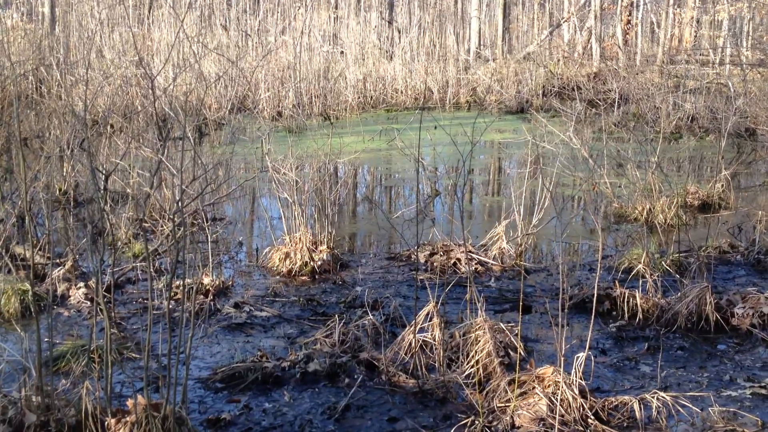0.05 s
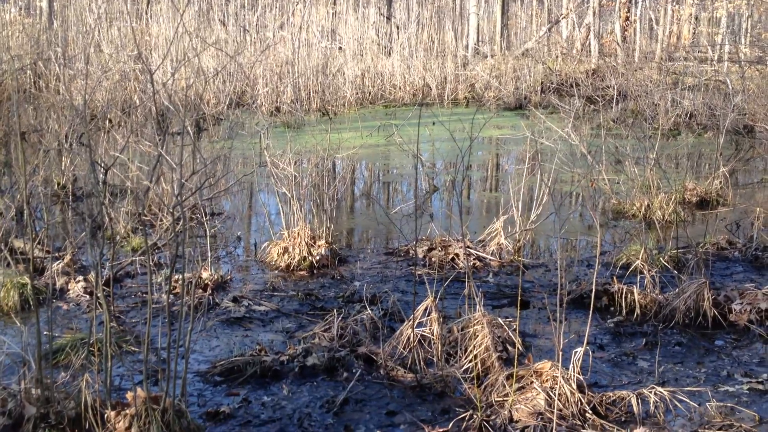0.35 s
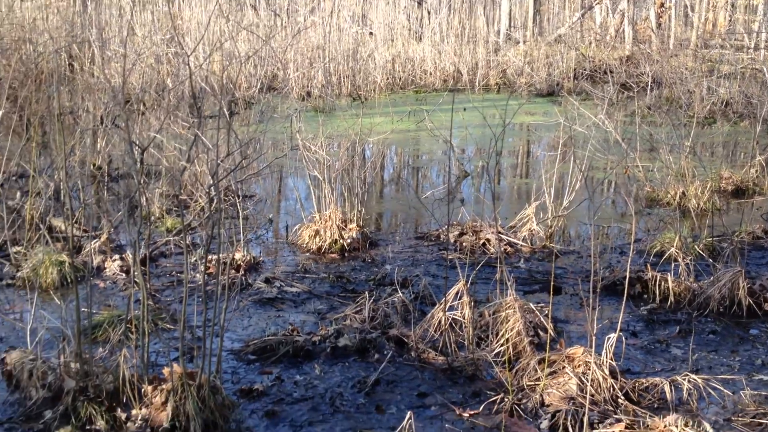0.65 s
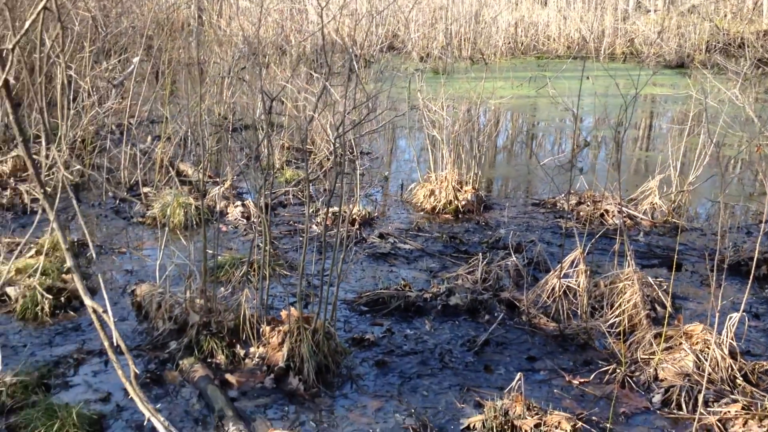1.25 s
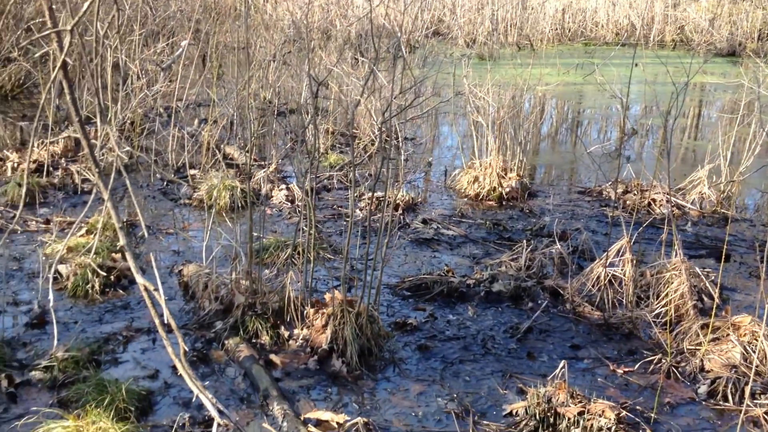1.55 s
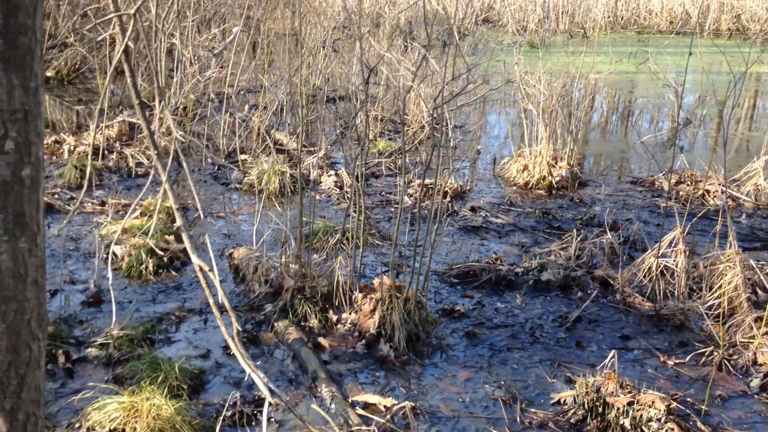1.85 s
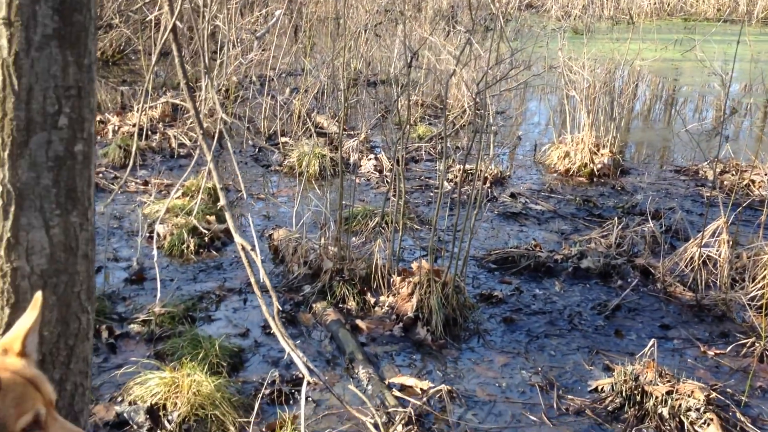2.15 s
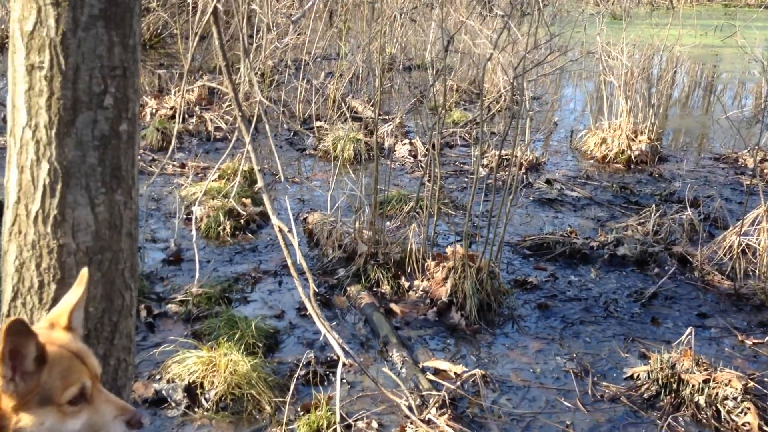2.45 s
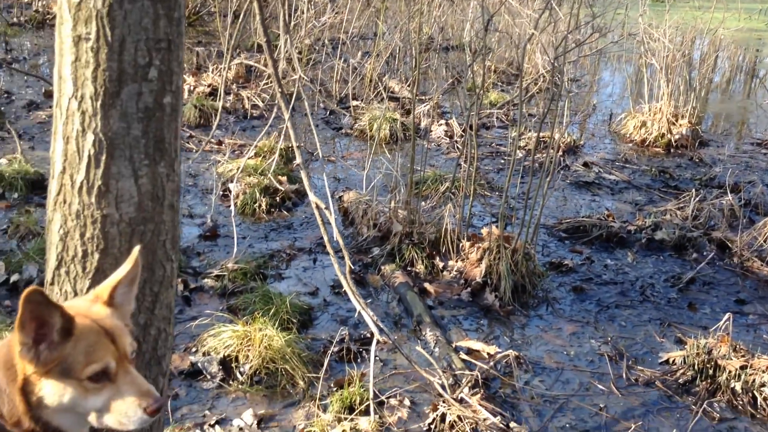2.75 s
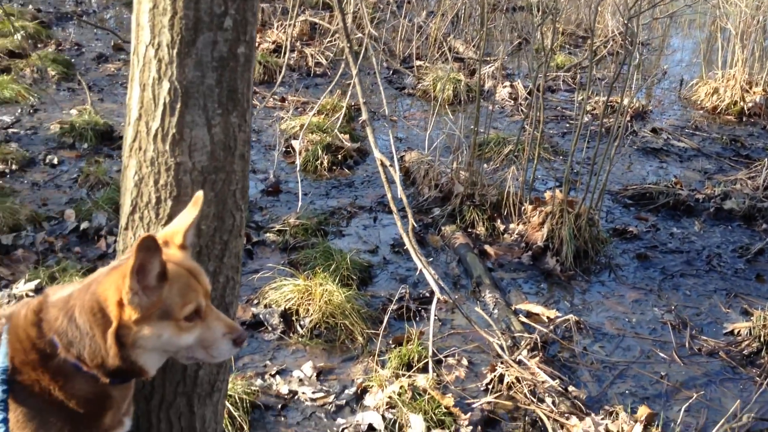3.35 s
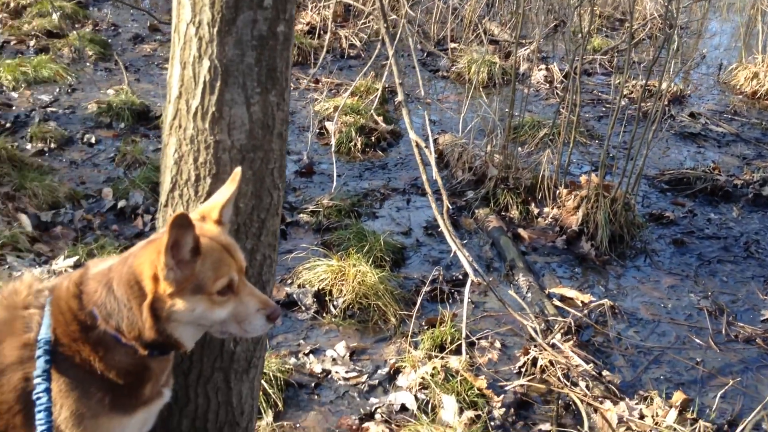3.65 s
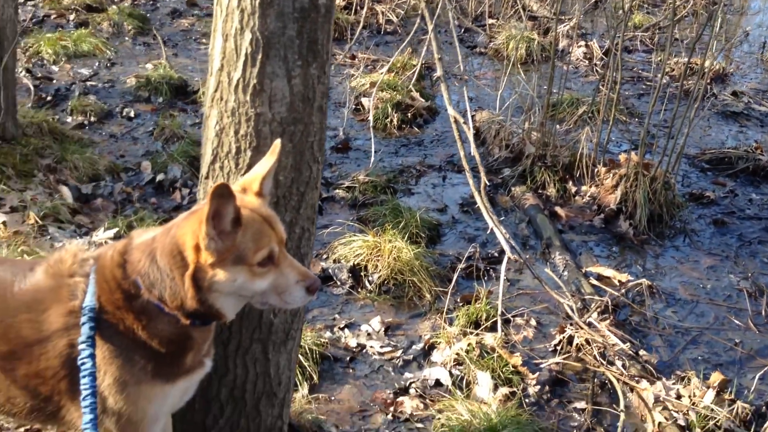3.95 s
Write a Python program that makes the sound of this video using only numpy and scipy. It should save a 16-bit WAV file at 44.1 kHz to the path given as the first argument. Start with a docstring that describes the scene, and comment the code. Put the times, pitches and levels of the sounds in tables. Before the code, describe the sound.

A chorus of shrill, rising frog peeps fills a marsh, ending with a short leafy rustle.

```python
"""Rising whistled peeps, near and far: a chorus of spring peepers at a marshy pool, with one short trill.
Each frog's vocal sac radiates a nearly pure tone, and trunks and water scatter it into reverberation.
A far bird squeaks in hoarse harmonic notes, and a distant engine hums, slowly sinking, in a wash of air.
Close by, dry leaves tick; near the end they rustle in a swarm of tiny impulses over a soft footfall."""
import sys
import numpy as np
from scipy import signal
from scipy.fft import rfft, irfft
from scipy.io import wavfile
from scipy.ndimage import uniform_filter1d

SR = 44100
rng = np.random.default_rng(int(sys.argv[2]) if len(sys.argv) > 2 else 0)


def materialize(psi):
    """Save the field psi as 16-bit PCM at rate SR to the path in sys.argv[1].

    A 1-D psi becomes a single channel; in a 2-D psi each row is a channel.
    """
    bounded = np.clip(np.atleast_2d(psi).T, -1, 1)
    quanta = np.round(bounded * 32767).astype(np.int16)
    wavfile.write(sys.argv[1], SR, quanta)


N = 176400

# Levels in the tables are relative.
# Near calls: start_s, length_s, first_hz, last_hz, sag_hz, level_db, swell_db
NEAR_PEEPS = [(-0.03, 0.061, 2787, 2894.0, -11, -35.5, 3.5), (0.0, 0.12, 2520, 2708.0, 22, -45.5, 11.5),
              (0.018, 0.08, 2945, 3150.0, -0.5, -40, -11), (0.11, 0.076, 2925, 3158.0, -1.5, -39.5, -8),
              (0.115, 0.17, 2822, 3276.0, 1.5, -36.5, -1.5), (0.172, 0.098, 2777, 2942.0, 15.5, -40, 6),
              (0.243, 0.065, 2634, 2674.0, 1, -48.5, 6), (0.305, 0.2, 2318, 2690.0, 49, -39, 16.5),
              (0.331, 0.097, 2735, 2886.0, 21.5, -42.5, 9), (0.42, 0.086, 2940, 3086.0, 9, -41, -3),
              (0.423, 0.1, 2544.0, 2686.0, 7, -34.5, 0.5), (0.53, 0.14, 2654, 2924.0, 4.5, -33.5, 0),
              (0.565, 0.04, 2657, 2702.0, -9.5, -34, 6), (0.561, 0.061, 2854, 3088.0, 1, -42.5, -7),
              (0.66, 0.045, 2822.0, 2830.0, 15.5, -35, -2), (0.691, 0.093, 2494, 2780.0, -6, -34.5, 1.5),
              (0.746, 0.045, 2936.0, 3030.0, 24.5, -39, 2), (0.786, 0.08, 2637, 2736.0, -23, -42.5, 7),
              (0.796, 0.11, 2702, 2956.0, -6.5, -37, -4.5), (0.839, 0.08, 2977, 3200.0, -18.5, -43.5, -4),
              (0.963, 0.099, 2898, 3244.0, 7, -36.5, 0), (0.973, 0.069, 2732, 2862.0, 17.5, -40.5, -7),
              (1.0, 0.15, 2862.0, 3106.0, 25, -42.5, -6), (1.128, 0.06, 2830, 3020.0, 25.5, -42, 10),
              (1.215, 0.099, 2766, 2900.0, -1.5, -36, 3), (1.25, 0.085, 2910, 3154.0, 5.5, -42.5, 3),
              (1.274, 0.087, 2528, 2700.0, 11, -34.5, 4.5), (1.29, 0.082, 2692, 2856.0, 0, -39.5, -5),
              (1.412, 0.092, 2622, 2824.0, -28.5, -43.5, -13), (1.449, 0.11, 2818.0, 3144.0, 32, -39, -7),
              (1.46, 0.091, 2674.0, 2796.0, 38.5, -40, -9), (1.557, 0.175, 2485, 2848.0, 29.5, -38.5, 7.5),
              (1.591, 0.11, 2923, 3270.0, 12, -39.5, 2), (1.679, 0.088, 2800, 3088.0, 30, -41.5, 10),
              (1.684, 0.071, 2533, 2736.0, 3, -38, 0), (1.809, 0.076, 2707, 2868.0, 12.5, -33, 4),
              (1.815, 0.12, 2781, 3008.0, 48, -36.5, -4), (1.959, 0.165, 2318.0, 2564.0, 49, -41.5, 6),
              (1.978, 0.11, 2944.0, 3190.0, 32, -40.5, -6), (2.004, 0.079, 2674, 2830.0, 3, -39, -8),
              (2.234, 0.09, 2767, 3030.0, 1.5, -40, -0.5), (2.348, 0.15, 2518.0, 2864.0, 37, -38.5, 9),
              (2.353, 0.064, 2712.0, 2762.0, 15, -40, 5), (2.36, 0.07, 2937, 3092.0, 34, -39, -1),
              (2.373, 0.065, 2940.0, 3086.0, -2, -46.5, 13), (2.449, 0.12, 2892, 3240.0, 4, -41, 2.5),
              (2.483, 0.065, 2444, 2546.0, 18, -41.5, 1), (2.491, 0.072, 2590, 2736.0, 15, -42, 2.5),
              (2.606, 0.11, 2685, 2930.0, 4, -34, -5), (2.627, 0.075, 2803, 2896.0, 1, -35.5, -4.5),
              (2.763, 0.08, 2525, 2700.0, 6, -38, 10), (2.771, 0.09, 2710, 2836.0, -5, -38.5, 2),
              (2.768, 0.084, 2808, 2980.0, 20.5, -36, 0), (2.785, 0.091, 2992, 3216.0, 2, -43, -2),
              (2.915, 0.053, 2500, 2530.0, 21, -49.5, -1), (2.915, 0.071, 3012, 3146.0, -1, -41.5, -14.5),
              (2.922, 0.08, 2800, 2944.0, 9.5, -42.5, -3), (3.01, 0.073, 2525, 2712.0, -0.5, -47, 9),
              (3.044, 0.11, 2910, 3210.0, 5.5, -38, -5), (3.079, 0.089, 2880, 3020.0, 10.5, -44.5, -8),
              (3.206, 0.11, 2656, 2874.0, 35, -41.5, 10), (3.207, 0.22, 2518, 2986.0, 24.5, -37.5, 2),
              (3.304, 0.07, 2993, 3030.0, 1.5, -43, 10), (3.33, 0.26, 2388, 2964.0, 55, -37.5, 7),
              (3.363, 0.1, 2536, 2746.0, 7, -42, 16), (3.39, 0.076, 2786, 2900.0, -4, -38, 5),
              (3.486, 0.12, 2373, 2446.0, 47, -46, -18), (3.49, 0.1, 2903, 3206.0, -8.5, -42, -8.5),
              (3.73, 0.08, 2788, 2926.0, 20, -42, 10), (3.74, 0.11, 2927, 3140.0, 24.5, -45.5, 1),
              (3.768, 0.11, 2709, 2976.0, 10.5, -35, 4), (3.907, 0.096, 2880, 3144.0, -1, -36.5, -2),
              (3.921, 0.061, 2820, 2884.0, 2.5, -34.5, 11), (3.932, 0.049, 2670.0, 2760.0, 20, -38.5, 3)]
# Partials of a peep: pitch_ratio
PARTIAL_RATIOS = [.5, 1, 1.5, 2, 2.5]
# Strength of those partials: level_db
PARTIAL_LEVELS = [-32.5, 1.5, -30, -41.5, -46]
# Low-voiced frogs sit nearest and excite the woods least: first_hz, echo_db
ECHO_BY_PITCH = [(2400, -12.5), (2540, -1.5), (2750, -1.5), (2950, -0.5)]
# Pulses of the trill: start_s, length_s, pitch_hz, level_db
TRILL_PULSES = [(2.06, 0.014, 2280, -49), (2.095, 0.012, 2380, -47.5), (2.127, .013, 2250, -47),
                (2.165, 0.012, 2330, -44), (2.198, 0.013, 2360, -46), (2.234, .015, 2370, -42.5),
                (2.266, 0.014, 2354, -44), (2.304, 0.021, 2385, -46.5), (2.34, 0.025, 2385, -44.5),
                (2.383, .03, 2435, -45)]
# Squeaks of the bird: start_s, length_s, first_hz, last_hz, level_db
BIRD_NOTES = [(0.188, 0.023, 1790, 1670, -59.5), (0.32, 0.034, 2045, 2140, -60.5),
              (0.355, .04, 1970, 1633, -65), (0.553, 0.081, 2030, 1910, -55.5),
              (0.778, 0.035, 1815, 1684, -66), (1.164, 0.03, 2064, 2150, -61.5),
              (1.204, 0.038, 1867, 1700, -65), (1.826, 0.023, 1970, 2100, -63),
              (1.859, 0.041, 1880, 1676, -62.5), (2.125, .08, 2040, 1813, -60.5),
              (2.489, 0.036, 1890, 1627, -61), (2.718, .03, 1816, 1645, -68),
              (3.07, 0.088, 2000, 1824, -62.5)]
# The bird's first four harmonics: level_db
BIRD_HARMONICS = [0.5, -1.5, -6.5, -10.5]
# Envelope of the rustle: time_s, level_db
RUSTLE_ENVELOPE = [(3.5, -78), (3.6, -68.5), (3.67, -55.5), (3.712, -46), (3.738, -54.5), (3.757, -46.5),
                   (3.775, -55), (3.82, -62), (3.845, -56), (3.87, -67.5), (3.955, -59), (3.972, -36.5),
                   (3.988, -41.5), (4, -46)]
# Spectral density of the rustle: frequency_hz, level_db
LEAF_SPECTRUM = [(40, -22), (150, -1), (600, -0.5), (1500, 3), (4000, 6), (7000, 4), (10000, -1.5),
                 (15500, -2.5)]
# Single twigs and leaves: start_s, peak_db, top_hz
TWIG_TICKS = [(1.494, -58.5, 12000), (1.968, -59, 11900), (2.142, -51, 8500), (2.148, -56, 8680),
              (2.155, -58, 8500), (2.429, -49, 10000), (3.232, -55, 9000), (3.237, -57, 8000),
              (3.6667, -42.5, 12960), (3.7544, -38, 8800), (3.8392, -46, 13000), (3.883, -45, 13800),
              (3.9417, -39, 14000), (3.9748, -33, 11000), (3.9902, -22.5, 16000)]
# One soft step in the leaves: start_s, peak_db
FOOTFALL = (3.744, -45.5)
# Fundamental of the engine: time_s, pitch_hz, level_db
ENGINE_TRACK = [(0, 117.3, -58), (.6, 113.3, -60.5), (1.2, 106, -63.5), (2, 101.7, -61),
                (2.8, 98.74, -66.5), (3.55, 95.1, -70), (3.63, 118.5, -77), (3.8, 114.7, -61),
                (4, 100.7, -73)]
# Spectral density of the air: frequency_hz, level_db
AIR_SPECTRUM = [(20, -25.5), (45, -22), (75, -12), (100, 3), (190, 7.5), (270, -0.5), (380, -4.5),
                (600, -2), (950, 0.5), (1800, -3.5), (3500, -19.5), (5500, -21.5), (8000, -21.5),
                (10500, -29), (13000, -23), (16000, -24.5)]
# Growth of the air's low and middle frequencies: time_s, gain_db
AIR_SWELL = [(0, 0.5), (1.2, 0.8), (2.5, 3.5), (3.5, 5), (4, 4.5)]

ATTACK_S, RELEASE_S = .0087, .0099
WAVER_HZ, FLUTTER_DB = 5, 2  # rms modulation within a call


def near_frogs(direct_db=-.5, echo_db=-5):
    """Direct and reverberant fields add: each near peep arrives with its echo from the woods."""
    direct, sent = np.zeros((2, N))
    for start, length, first_hz, *shape in NEAR_PEEPS:
        call = peep(length, first_hz, *shape)
        add(direct, start, call)
        add(sent, start, call * spectrum(ECHO_BY_PITCH, first_hz))
    return amp(direct_db) * direct + amp(echo_db) * woods(sent)


def peep(length, first_hz, last_hz, sag_hz, level_db, swell_db):
    """Selective radiation: the vocal sac favours one partial, while its faint neighbours come and go."""
    phase, envelope = glide(length, first_hz, last_hz, sag_hz, swell_db)
    drifts = flutter(np.arange(len(phase)) / SR, len(PARTIAL_RATIOS))
    tone = sum(amp(db + FLUTTER_DB * drift * (ratio != 1)) * np.sin(ratio * phase)
               for ratio, db, drift in zip(PARTIAL_RATIOS, PARTIAL_LEVELS, drifts))
    return amp(level_db) * envelope * tone


def glide(length, first_hz, last_hz, sag_hz=0, swell_db=0):
    """Phase is the integral of frequency: returns the phase and envelope of one gliding note."""
    t = np.arange(0, length + RELEASE_S / 2, 1 / SR)
    progress = t / length
    waver, tremble = flutter(t, 2)
    sag = sag_hz * (1 - (2 * progress - 1) ** 2)
    hz = first_hz + (last_hz - first_hz) * progress - sag + WAVER_HZ * waver
    ramp = np.clip(np.minimum(t / ATTACK_S, (t[-1] - t) / RELEASE_S), 0, 1)
    envelope = np.sin(np.pi / 2 * ramp) ** 2 * amp(swell_db * (progress - .5) + FLUTTER_DB * tremble)
    return 2 * np.pi * np.cumsum(hz) / SR, envelope


def flutter(t, count):
    """Random modulation: six sinusoids of unrelated rates sum to each curve, of rms about 1."""
    rates_hz = rng.uniform(4.03, 65, (count, 6, 1))
    offsets = rng.random((count, 6, 1))
    coarse_t = np.linspace(0, t[-1], 100)
    curves = np.sin(2 * np.pi * (rates_hz * coarse_t + offsets)).sum(1) / np.sqrt(3)
    return [np.interp(t, coarse_t, row) for row in curves]


def trill(half_rise_hz=25, echo_db=-9):
    """A pulse train: one close frog stutters short rising peeps, slowing at the end."""
    out = np.zeros(N)
    for start, length, hz, db in TRILL_PULSES:
        add(out, start, peep(length, hz - half_rise_hz, hz + half_rise_hz, 0, db, 0))
    return out + amp(echo_db) * woods(out)


def far_frogs(calls_per_s=30, length_s=.12, low_hz=2573, high_hz=2948, rise_hz=229.2):
    """Incoherent sources: many random peeps across the marsh, heard only as reverberation."""
    out = np.zeros(N)
    for slot, (when, pitch, size, loudness) in enumerate(rng.random((200, 4))):
        start = (slot + when) / calls_per_s - length_s
        if start < N / SR:
            hz = low_hz + (high_hz - low_hz) * pitch
            length = length_s * (.7 + .586 * size)
            level_db = -52.5 + 6.5 * (2 * loudness - 1)
            add(out, start, peep(length, hz, hz + rise_hz, 0, level_db, swell_db=2.3))
    return woods(out)


def woods(sound, early_t60_s=.18, early_db=2.5, tail_t60_s=1, delay_s=.006):
    """Reverberation by scattering: close trunks and the water answer first, then a longer tail decays."""
    t = np.arange(SR) / SR
    decay = amp(-60 * t / tail_t60_s) + amp(early_db - 60 * t / early_t60_s)
    reflections = rng.standard_normal(SR) * (rng.random(SR) < .05) * (t > delay_s) * decay
    return signal.fftconvolve(sound, reflections / np.linalg.norm(reflections))[:N]


def bird(jitter_hz=28.8, dulling_db_per_s=129.5, echo_db=-6.5):
    """Frequency jitter roughens a harmonic series into short, slightly hoarse notes."""
    out = np.zeros(N)
    for start, length, first_hz, last_hz, db in BIRD_NOTES:
        phase, envelope = glide(length, first_hz, last_hz)
        jitter = unit(uniform_filter1d(rng.standard_normal(len(phase)), size=100))
        phase += 2 * np.pi * np.cumsum(jitter_hz * jitter) / SR
        loss_db = dulling_db_per_s * length  # longer notes have weaker upper harmonics
        tone = sum(amp(harmonic_db - (k > 2) * loss_db) * np.sin(k * phase)
                   for k, harmonic_db in enumerate(BIRD_HARMONICS, 1))
        add(out, start, amp(db) * envelope * tone)
    return out + amp(echo_db) * woods(out)


def leaves(crackles_per_s=7000, spread_db=2.5):
    """Shot noise: dense tiny crackles of dry leaves merge into a rustle."""
    crackles = rng.choice([-1, 1], N) * amp(spread_db * np.minimum(rng.exponential(1, N), 4))
    crackles *= rng.random(N) < crackles_per_s / SR
    colour = spectrum(LEAF_SPECTRUM, np.fft.rfftfreq(N, 1 / SR))
    return unit(irfft(rfft(crackles) * colour, N)) * amp(curve(RUSTLE_ENVELOPE))


def twigs(decay_s=.0016, low_hz=3000):
    """Damped transients: each twig or leaf ticks in a bright noise burst that decays exponentially."""
    out = np.zeros(N)
    t = np.arange(1000) / SR
    for start, db, top_hz in TWIG_TICKS:
        burst = rng.standard_normal(len(t)) * np.exp(-t / decay_s)
        tick = signal.lfilter(*signal.butter(2, [low_hz, top_hz], "band", fs=SR), burst)
        add(out, start, amp(db) * tick / abs(tick).max())
    return out


def footfall(band_hz=(329, 700)):
    """The impulse response of a low band gives the dull knock of a step under the rustle."""
    start, db = FOOTFALL
    out = np.zeros(N)
    band = signal.butter(2, band_hz, "band", fs=SR, output="sos")
    knock = signal.sosfilt(band, signal.unit_impulse(2000))
    add(out, start, amp(db) * knock / abs(knock).max())
    return out


def engine(waver_hz=1.5, flutter_db=2, second_db=-10.5):
    """A periodic source heard from afar: the engine's two lowest harmonics waver in the air."""
    hz = curve(ENGINE_TRACK) + waver_hz * wander(12)
    phase = 2 * np.pi * np.cumsum(hz) / SR
    first = amp(flutter_db * wander(30)) * np.sin(phase)
    second = amp(second_db + flutter_db * wander(17)) * np.sin(2 * phase)
    return amp(curve(ENGINE_TRACK, column=2)) * (first + second)


def air(level_db=-59, patch_db=1.5, body_hz=1800):
    """Broadband ambient noise: patches of its spectrum drift, and its body slowly grows."""
    hz, t, noise = signal.stft(rng.standard_normal(N), SR, nperseg=2048, noverlap=1536)
    patches = uniform_filter1d(rng.standard_normal(noise.shape), size=20, axis=0)
    patches = unit(uniform_filter1d(patches, size=8, axis=1))
    swell_db = np.interp(t, *np.transpose(AIR_SWELL)) / (1 + (hz[:, None] / body_hz) ** 2)
    shaped = noise * spectrum(AIR_SPECTRUM, hz)[:, None] * amp(patch_db * patches + swell_db)
    _, wash = signal.istft(shaped, SR, nperseg=2048, noverlap=1536)
    return amp(level_db) * unit(wash[:N])


def wander(cutoff_hz):
    """Low-pass filtered noise gives slow random motion of rms 1."""
    hz = np.fft.rfftfreq(N, 1 / SR)
    return unit(irfft(rfft(rng.standard_normal(N)) * np.exp(-(hz / cutoff_hz) ** 2), N))


def amp(db):
    """The decibel law: 20 dB is a factor of ten in amplitude."""
    return 10 ** (np.asarray(db) / 20)


def unit(x):
    """Normalisation to rms 1."""
    return x / np.sqrt(np.mean(x ** 2) + 1e-20)


def curve(rows, column=1):
    """Linear interpolation of a time table at every sample."""
    rows = np.array(rows)
    return np.interp(np.arange(N) / SR, rows[:, 0], rows[:, column])


def spectrum(points, hz):
    """Frequency response: gain from levels interpolated on a log-frequency axis."""
    points_hz, db = np.transpose(points)
    return amp(np.interp(np.log(hz + 1), np.log(points_hz), db))


def add(mix, start, sound):
    """Superposition of a sound on the mix at its start time."""
    at = round(start * SR)
    sound = sound[max(-at, 0):]
    part = mix[max(at, 0):][:len(sound)]
    part += sound[:len(part)]


def scene():
    """Sound pressures add: the calls and their surroundings sum in one channel."""
    calls = near_frogs() + trill() + far_frogs() + bird()
    return (calls + engine() + air() + leaves() + twigs() + footfall())[None]


def record(dry):
    """Band limiting: a low-pass filter removes the highest treble."""
    lowpass = signal.firwin(1023, cutoff=15380, window=("kaiser", 9), fs=SR)
    return signal.oaconvolve(dry, lowpass[None], "same")


dry = scene()
out = record(dry)
materialize(out)
```